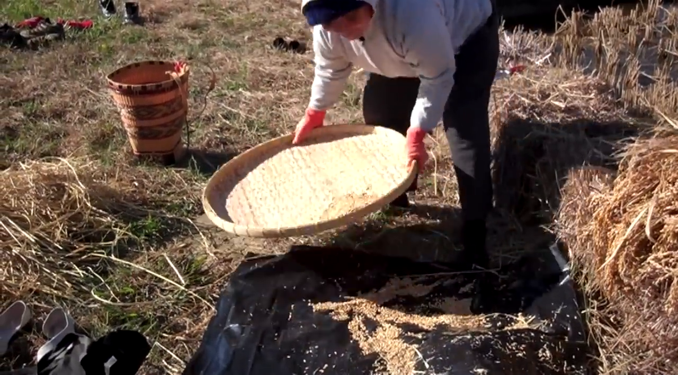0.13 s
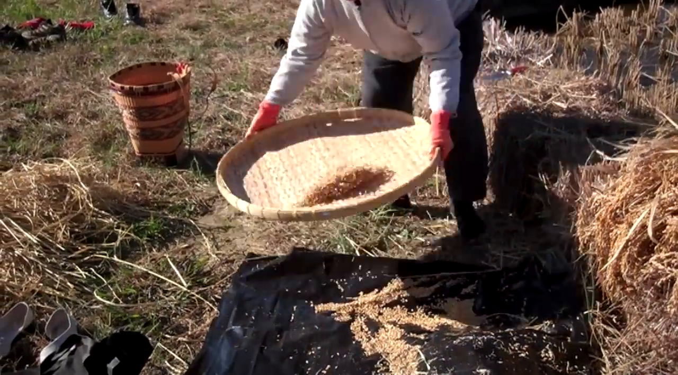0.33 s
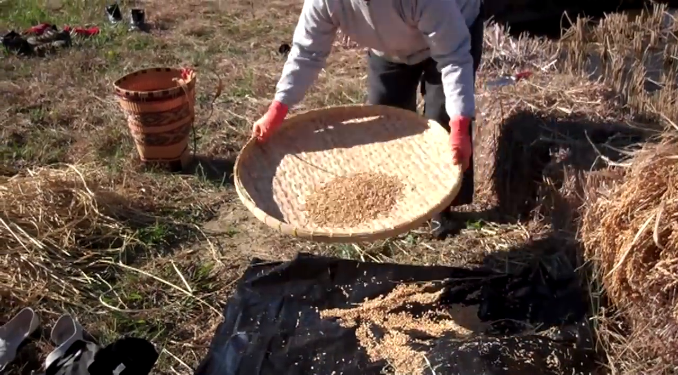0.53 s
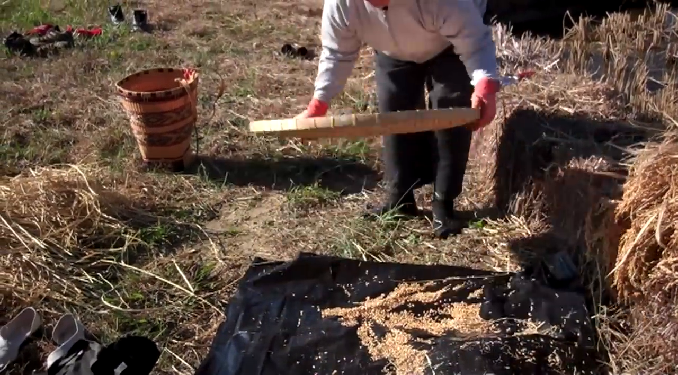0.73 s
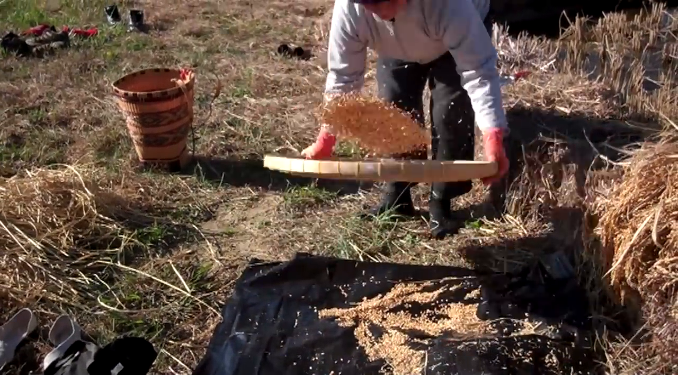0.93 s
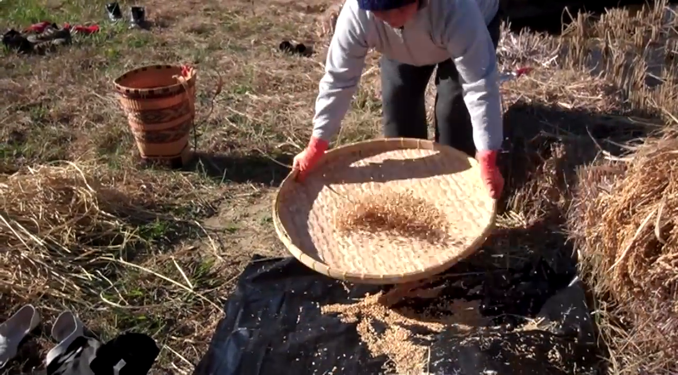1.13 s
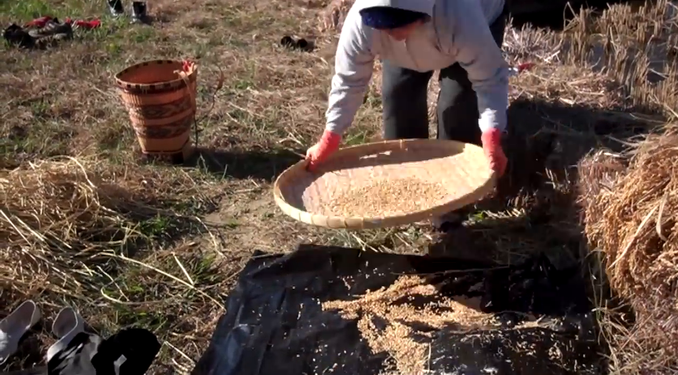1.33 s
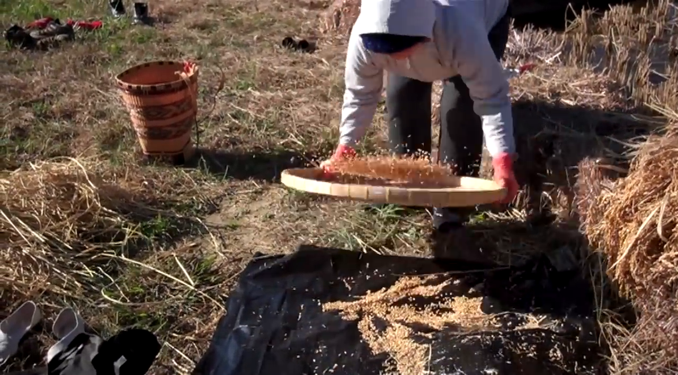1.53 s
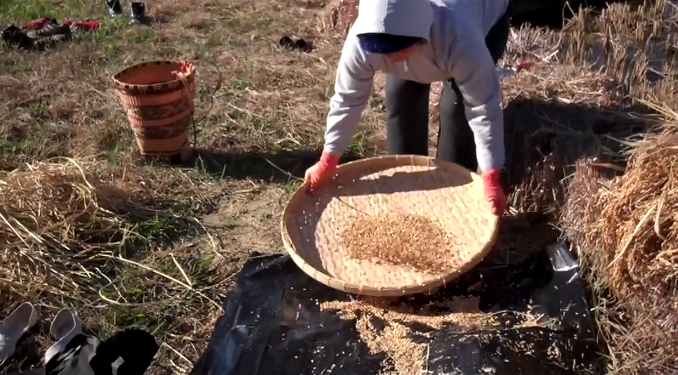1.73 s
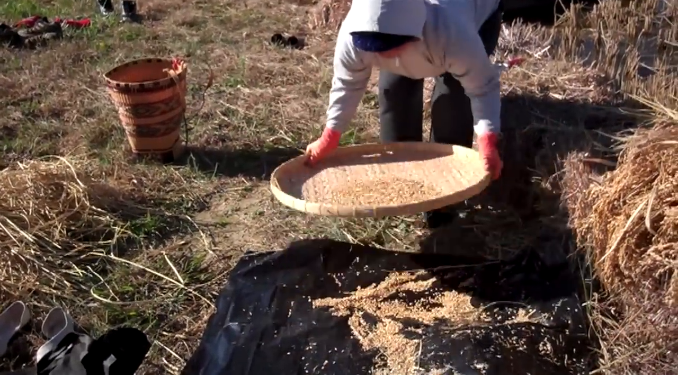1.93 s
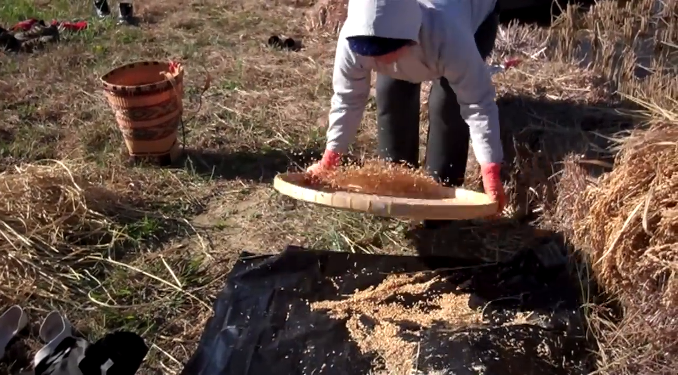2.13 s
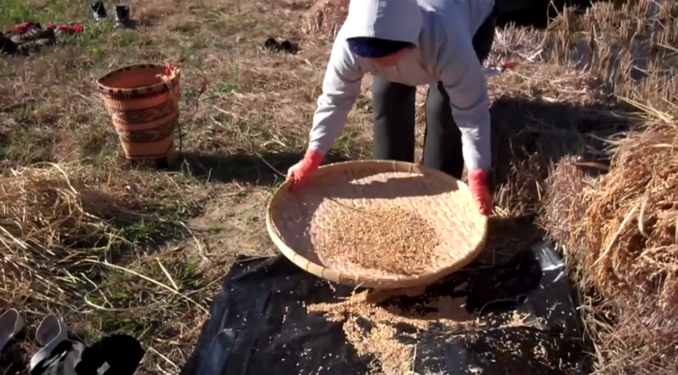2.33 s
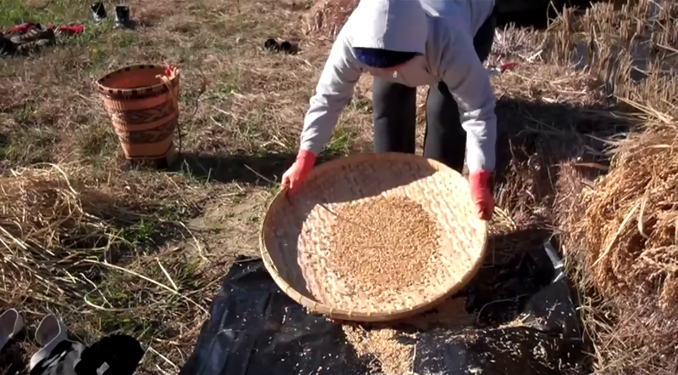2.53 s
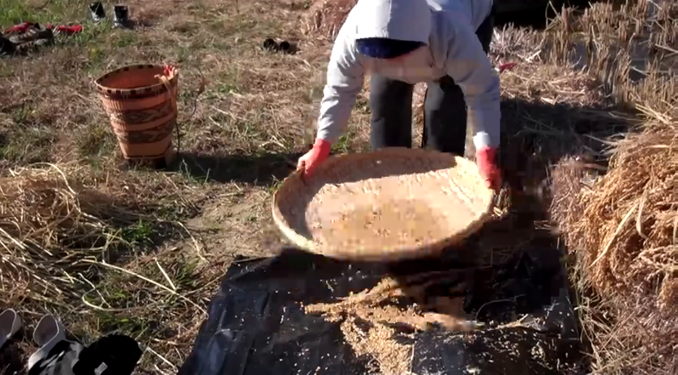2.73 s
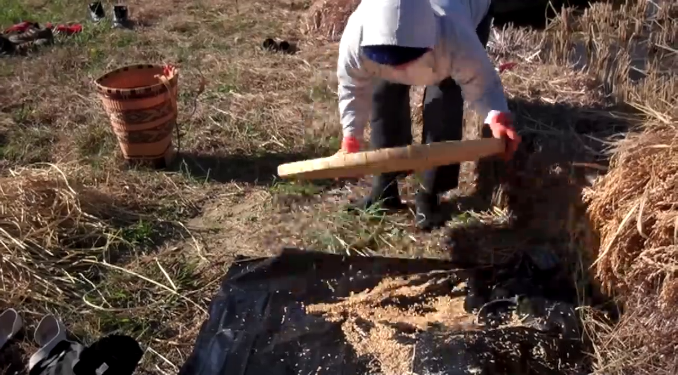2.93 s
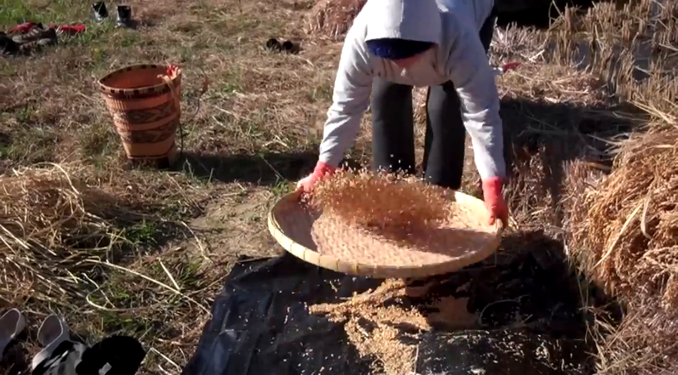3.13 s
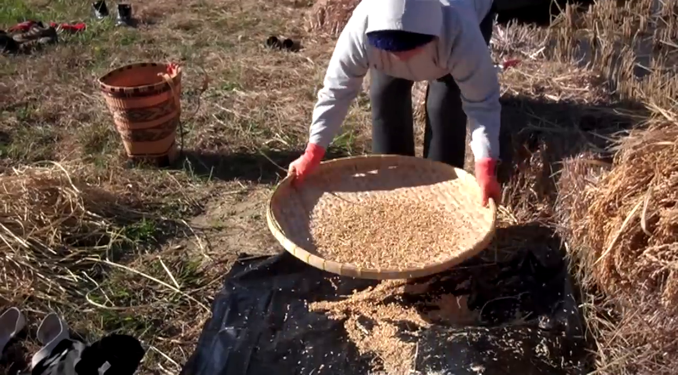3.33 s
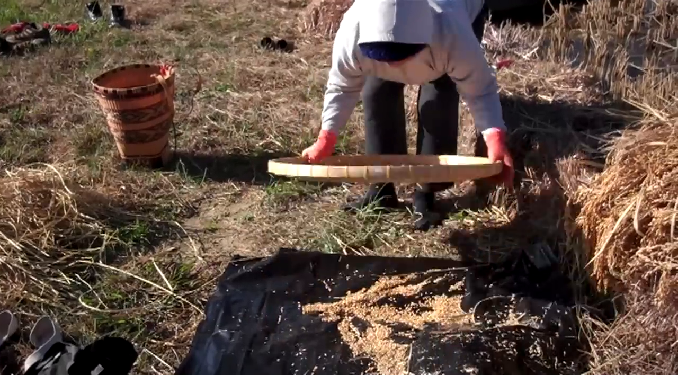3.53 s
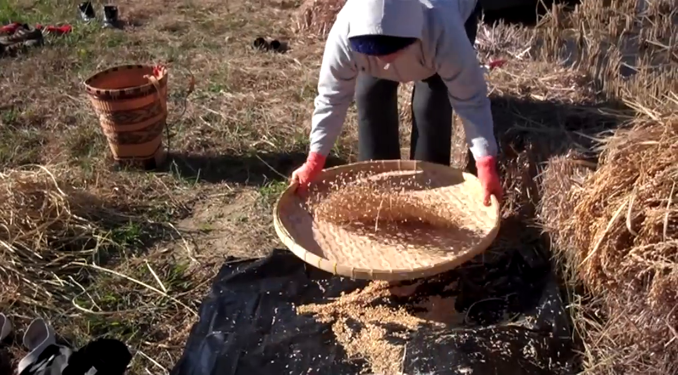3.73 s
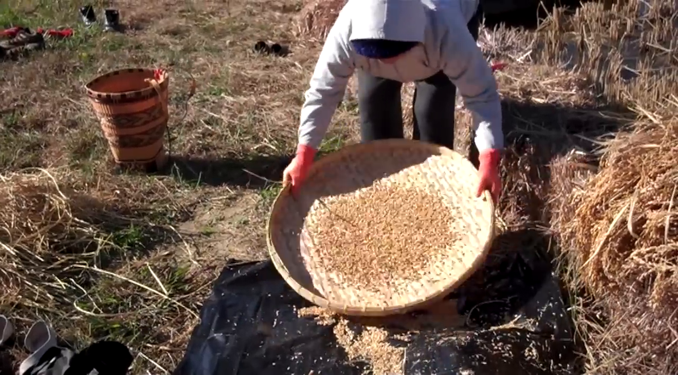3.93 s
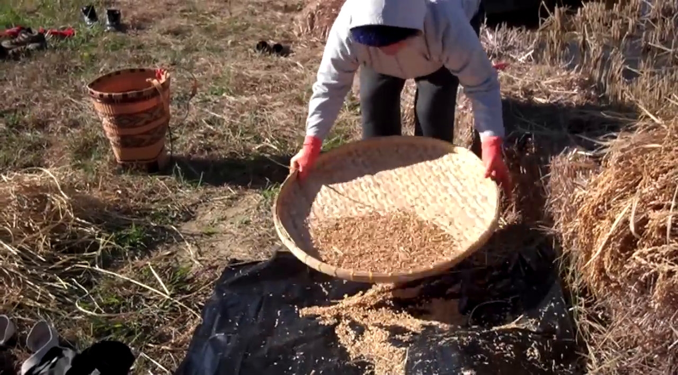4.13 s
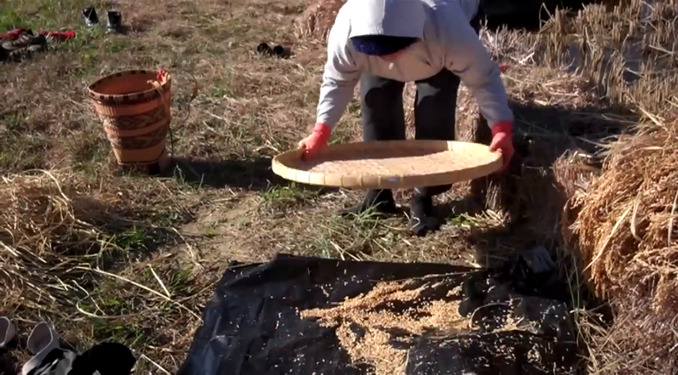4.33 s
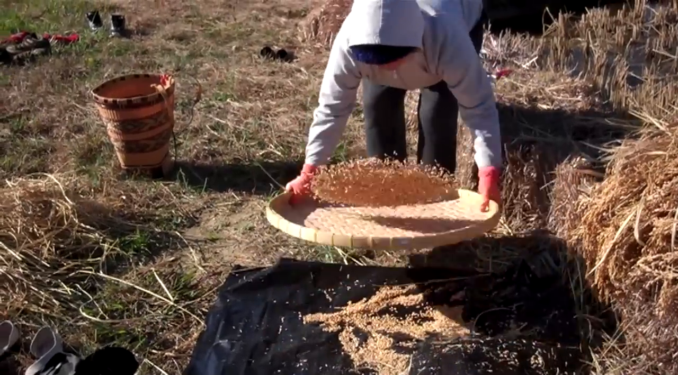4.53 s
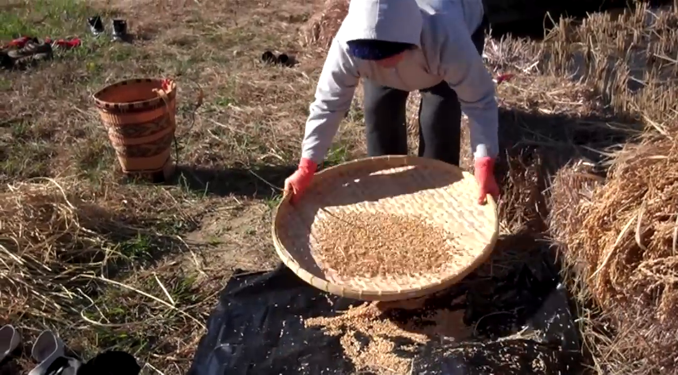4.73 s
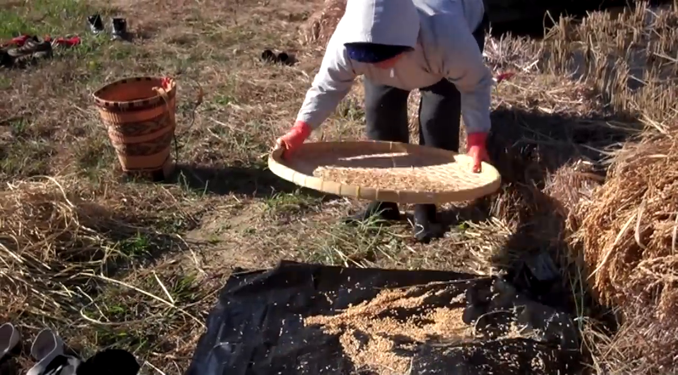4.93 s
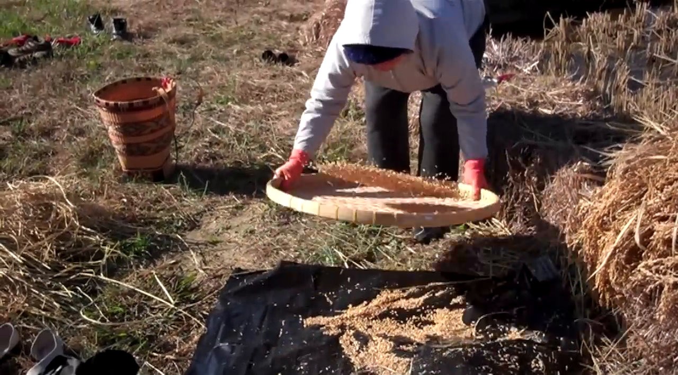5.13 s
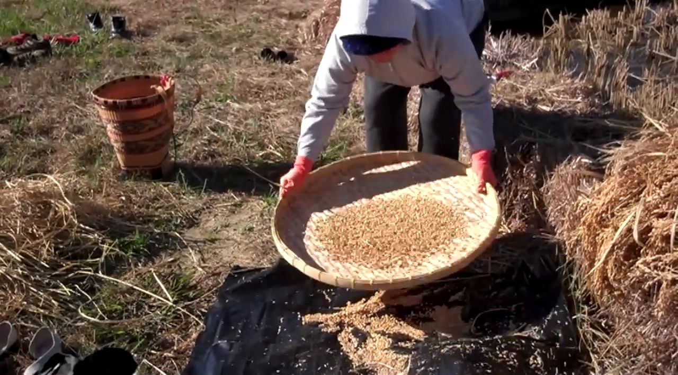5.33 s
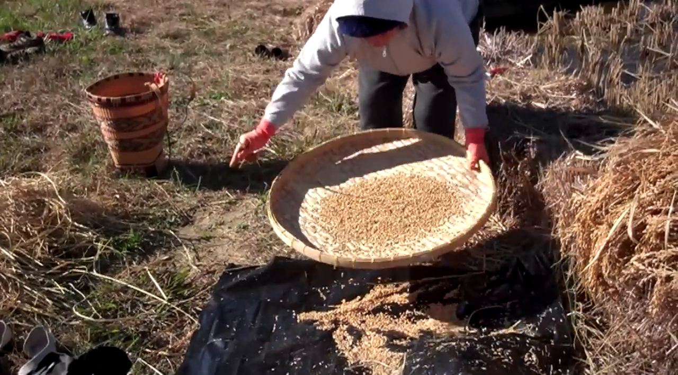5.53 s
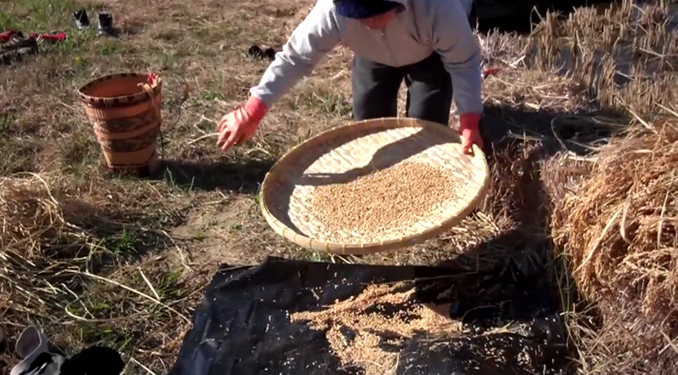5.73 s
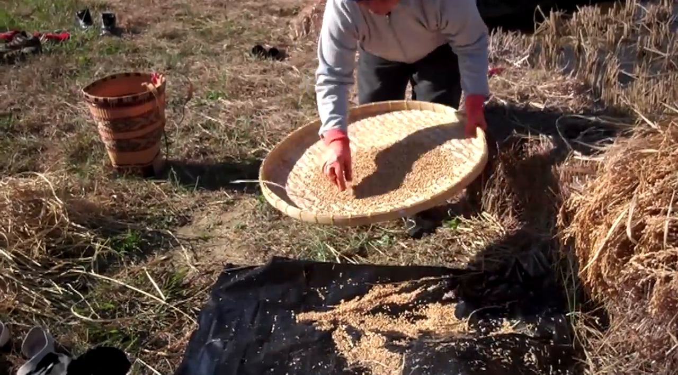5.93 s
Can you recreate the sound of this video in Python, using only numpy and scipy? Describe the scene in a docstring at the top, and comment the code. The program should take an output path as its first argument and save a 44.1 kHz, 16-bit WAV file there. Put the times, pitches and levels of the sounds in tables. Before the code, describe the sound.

Close stereo pickup of grain being winnowed by hand: sharp, sandy bursts arrive roughly every half second, with longer gaps where the heap merely slides across the weave. Each catch starts abruptly, swells for a fifth of a second and fades quickly. Ground reflection subtly colours the tray as it rises and sinks. Low open-field air, soft wind puffs and fine straw rustling lie beneath; the end settles into small bamboo ticks.

```python
"""Rice grain is tossed and shaken on a flat woven bamboo tray: dense random impacts, husk clicks over weave patter.
Each toss lands as a shower and runs off; the heap also slides, clumps stray, loose grains hop, the tray creaks.
The ground echoes the tray, with a delay that follows its height.
Dry straw crackles off to the right; filtered noise makes the breeze, mostly at the right microphone port,
and the low wash of the open harvested field."""
import sys
import numpy as np
from scipy import signal
from scipy.fft import rfft, irfft
from scipy.io import wavfile
from scipy.ndimage import map_coordinates

SR = 44100
rng = np.random.default_rng(int(sys.argv[2]) if len(sys.argv) > 2 else 0)


def waveform_to_disk(signal):
    """Save audio, clipped to [-1, 1], as 16-bit WAV at the path in sys.argv[1]."""
    frames = np.transpose(np.atleast_2d(signal))
    scaled = np.clip(frames, -1, 1) * 32767
    samples = np.round(scaled).astype(np.int16)
    wavfile.write(sys.argv[1], SR, samples)


N = 268701
TAPS = 2048  # samples per impact before trimming
T = np.arange(N) / SR
HZ = np.fft.rfftfreq(TAPS, 1 / SR)

# Husk click. Each row: frequency in Hz, relative density in dB per Hz.
HUSK_SPECTRUM = [(1200, -39.5), (2000, -18), (2750, -12.5), (3100, -9.5), (4200, -9), (5100, -7.5),
                 (6500, -2.5), (7050, -2), (7700, 2), (8300, -6), (9500, -9), (10900, -17), (14000, -17)]
# Weave patter. Each row: frequency in Hz, relative density in dB per Hz.
WEAVE_SPECTRUM = [(140, -70), (230, -25.5), (330, -16.5), (440, -23.5), (560, -11.5), (780, -3.5),
                  (1170, -1.5), (1430, -3.5), (1850, 1), (2600, -6), (3400, -13.5), (5700, -77)]
# Tray at the two ports. Each row: frequency in Hz, left over right in dB.
TRAY_BALANCE = [(500, 0), (2000, 0.4), (2700, -2.5), (4200, 0.8), (5200, -0.3), (6400, -1.9), (7100, 1.5),
                (7750, 10.1), (8400, 8.0), (9500, 12.6), (11000, 13.0), (13500, 25.0)]
# Likeness of the ports for the tray. Each row: frequency in Hz, likeness 0-1.
TRAY_LIKENESS = [(100, .9), (500, 1), (1200, .99), (2500, .76), (3800, .99), (4800, .74), (6800, .9),
                 (9000, .56), (12000, .3)]
# Catches. Each row: start in s, shower length in s, relative husk hiss in dB, weave weight in dB against the hiss,
# place of the peak 0-1, run-off in dB against the hiss, run-off fade in dB per s, run-off length in s.
LANDINGS = [(1.147, 0.2, -14.5, -12, 0.41, -8.5, 71, .25), (1.747, .18, -14.5, -13, 0.63, -9.5, 74, 0.18),
            (2.309, .178, -14.5, -12.5, 0.48, -6.5, 80, 0.062),
            (3.238, .18, -14, -12.5, 0.45, -14.5, 100, 0.18), (3.797, 0.17, -14, -12.5, 0.43, -7, 77, 0.12),
            (4.683, 0.18, -14.5, -12, 0.55, -13, 83, 0.15), (5.259, 0.18, -14.5, -13.5, 0.58, -15, 28, .18)]


def amp(db):
    """Decibels to gain."""
    return 10 ** (np.asarray(db) / 20)


def curve_at(points, hz):
    """Joins points by straight lines on a log-frequency axis."""
    f, value = np.transpose(points)
    return np.interp(np.log(hz + 1), np.log(f + 1), value)


def level_curve(points):
    """Joins (s, dB) points over the scene and returns gain."""
    return amp(np.interp(T, *np.transpose(points)))


def unit_rms(x):
    """Scales a stereo pair so that its centre has rms 1."""
    return x / np.sqrt(np.mean(x.mean(0) ** 2) + 1e-20)


def mix_in(mix, start_s, sound):
    """Adds a stereo sound at start_s, cut at the end of the mix."""
    part = mix[:, round(start_s * SR):][:, :sound.shape[1]]
    part += sound[:, :part.shape[1]]


def minimum_phase(db):
    """Response with this gain that rings only after the blow."""
    log_gain = np.log(amp(np.maximum(db, -100)))
    circle = np.concatenate([log_gain, log_gain[-2:0:-1]])
    return np.exp(np.conj(signal.hilbert(circle)))[:len(db)]


def impacts(spectrum, balance, likeness, ring_ms, lag_ms, count=48):
    """Stereo ticks, one per spot struck: decaying noise, each different, sharing one mean spectrum."""
    # Phase between ports. Each row: frequency in Hz, left lead in radians.
    port_phase = [(0, 0), (1500, 0), (2400, -.6), (3000, -.1), (4200, 0), (4800, -.7), (5900, -.7),
                  (7300, .25), (9000, -1), (14000, -2.8)]
    ms = 1000 * np.arange(TAPS) / SR
    a, b = rfft(rng.standard_normal((2, count, TAPS)) * np.exp(-ms / ring_ms))
    b = b - a * (b * a.conj()).mean(0) / (abs(a) ** 2).mean(0)  # the part the ports do not share
    left, own = (z / np.sqrt((abs(z) ** 2).mean(0)) for z in (a, b))
    same = np.clip(curve_at(likeness, HZ), 0, 1)
    left_lead = curve_at(port_phase, HZ) - 2 * np.pi * HZ * lag_ms / 1000
    right = same * left + np.sqrt(1 - same ** 2) * own
    right = right * np.exp(-1j * left_lead) / amp(curve_at(balance, HZ))
    ticks = irfft(np.array([left, right]) * minimum_phase(curve_at(spectrum, HZ)))
    return np.roll(ticks, 24, axis=-1)[..., :TAPS // 2]  # room ahead for phase lead


def tray_impacts(spectrum, ring_ms):
    """Ticks with the port differences of the tray."""
    return impacts(spectrum, TRAY_BALANCE, TRAY_LIKENESS, ring_ms, lag_ms=0)


def shower(ticks, per_s, spread_db):
    """Random impacts of uneven size on random spots, at steady power whatever their rate."""
    chance = np.clip(per_s / SR, 1e-4, 1)
    size = amp(spread_db * np.minimum(rng.exponential(1, N), 5)) * rng.choice([-1, 1], N)
    clicks = size * (rng.random(N) < chance) / np.sqrt(chance)
    spot = rng.integers(0, ticks.shape[1], N)
    out = np.zeros((2, N))
    for k in range(ticks.shape[1]):
        struck = clicks * (spot == k)
        out += signal.oaconvolve(struck[None], ticks[:, k], axes=1)[:, :N]
    return unit_rms(out)


def wobble(corner_hz):
    """Slow random wobble of rms 1: low-passed noise."""
    slow = irfft(rfft(rng.standard_normal(N)) / (1 + (np.fft.rfftfreq(N, 1 / SR) / corner_hz) ** 4), N)
    return slow / slow.std()


def step(s, width_s):
    """Goes smoothly from 0 to 1 around time s."""
    return .5 + .5 * np.tanh((T - s) / (2 * width_s))


def loose_grains(level_db=-64, per_s=60):
    """Single grains keep hopping on the weave: sparse random impacts throughout."""
    return amp(level_db) * shower(tray_impacts(WEAVE_SPECTRUM, ring_ms=3.0), per_s, spread_db=3.0)


def height_m():
    """Tray height over the ground: highest before each landing, lowest just after the catch."""
    high_m, low_m, high_before_s, low_after_s = .6, 0.2425, 0.265, 0.091
    turns = [(0, low_m)]
    for s, *_ in LANDINGS:
        turns += [(s - high_before_s, high_m), (s + low_after_s, low_m)]
    return np.interp(T, *np.transpose(turns))


def with_ground(x, echo_db=-11, dull_hz=5000):
    """The ground returns the tray's sound, duller; the delay sweeps as the tray rises and sinks."""
    delay_s = 2 * height_m() / 343
    late = np.array([map_coordinates(port, [np.arange(N) - delay_s * SR], order=3) for port in x])
    echo = signal.lfilter(*signal.butter(1, dull_hz, fs=SR), late)
    return amp(-0.36) * (x + amp(echo_db) * echo)


def straw():
    """Dry stalks crackle: a dense shower of short ticks that reaches the right port first."""
    # Rustle. Each row: time in s, level in dB.
    rustle = [(0, -32), (.08, -37.5), (.34, -37), (.75, -45), (1.1, -43), (1.7, -36.5), (2.12, -42),
              (3.05, -39), (3.7, -36.5), (4.45, -37), (4.58, -43), (5.05, -41), (5.6, -35.5), (5.87, -34),
              (6.05, -40)]
    # One crackle. Each row: frequency in Hz, relative density in dB per Hz.
    crackle = [(200, -33), (400, -22.5), (750, -15), (1250, -17.5), (2300, -10.5), (3500, -8), (4800, -4.5),
               (5700, -5.5), (6700, 0.2), (8200, 2), (10500, -8.5), (12300, -7.5), (14000, -11)]
    # Straw at the ports. Each row: frequency in Hz, left over right in dB.
    balance = [(1200, 1.7), (2100, -4.0), (3400, -1.3), (4700, -3.3), (5900, -9.0), (7200, 1.2),
               (8400, 8.2), (10500, 6.7), (13500, 17.4)]
    # Likeness of the ports for straw. Each row: frequency in Hz, likeness 0-1.
    likeness = [(500, 0.99), (2000, 0.46), (5000, 0.81), (7500, 1), (13000, 0.2)]
    ticks = impacts(crackle, balance, likeness, ring_ms=0.63, lag_ms=0.1)
    return level_curve(rustle) * shower(ticks, 13000, spread_db=2.0)


def eddies(hz, width_hz, size):
    """Swirling air, separate at each port: a noise band as a complex signal of rms 1."""
    r = np.exp(-np.pi * width_hz / SR)
    a, b = rng.standard_normal((2, 2, size + TAPS))
    swirl = signal.lfilter([1], np.poly([r, r]), a + 1j * b)[:, TAPS:]
    swirl = swirl / np.sqrt((abs(swirl) ** 2).mean(1, keepdims=True))
    return swirl * np.exp(2j * np.pi * hz * np.arange(size) / SR)


def breeze(left_db=-13, right_db=-1, gust_db=4):
    """Eddies bump the right port in puffs over an uneven flutter; the left port is sheltered."""
    # Flutter, dying away near the end. Each row: time in s, level in dB before port gain.
    wind = [(0, -48.5), (2.0, -47.5), (2.55, -51), (2.9, -42.5), (3.5, -65), (3.9, -52.5), (4.4, -48),
            (4.7, -69.5), (6.1, -69)]
    # Puffs. Each row: middle in s, peak in dB before port gain, centre in Hz, nominal length in s.
    puffs = [(0.248, -29, 196, 0.049), (.324, -35, 196, .02), (.418, -33, 150, .035),
             (0.672, -33, 164, 0.045), (0.885, -28.5, 196, 0.07), (1.656, -32, 157, 0.055),
             (2.035, -33.5, 166, 0.11), (2.14, -35.5, 225, .06), (2.21, -28.5, 198, 0.08),
             (2.286, -29.5, 160, 0.09), (2.83, -28.5, 123.3, 0.12), (2.947, -28, 152, 0.07),
             (3.074, -34, 143, 0.034), (3.28, -37, 155, 0.2), (3.952, -32, 110, .055),
             (4.449, -34, 102, 0.065)]
    out = level_curve(wind) * amp(gust_db * wobble(17)) * eddies(105, 140, size=N).real
    for s, db, hz, length_s in puffs:
        size = round(1.1 * length_s * SR)
        puff = eddies(hz, 4.6 / length_s, size).real * np.hanning(size)  # the shorter, the broader
        mix_in(out, s - size / SR / 2, amp(db) * puff / abs(puff).max(1, keepdims=True))
    return amp([[left_db], [right_db]]) * out


def air(level_db=-56.5, apart=0.26):
    """Low steady wash of the open field: shaped noise, partly opposed between the ports."""
    # Field. Each row: frequency in Hz, relative density in dB per Hz.
    field = [(15, -36), (25, -11), (70, 4.5), (156, -0.5), (461, -7.5), (575, -4), (678, -2), (1410, -12.5),
             (2000, -14), (2600, -10), (4400, -120)]
    gain = amp(curve_at(field, np.fft.rfftfreq(N, 1 / SR)))
    shared, side = rfft(rng.standard_normal((2, N))) * gain
    return amp(level_db) * unit_rms(irfft(np.array([shared + apart * side, shared - apart * side]), N))


def creaks(level_db=5.0, ring_s=0.006, width_hz=700):
    """Bamboo strips slip against each other: a brief noise snap rings the tray."""
    # Creaks and ticks. Each row: start in s, peak in dB before level_db, resonance in Hz.
    snaps = [(0.089, -42, 1880), (0.147, -42, 902), (0.699, -33.5, 1390), (0.811, -43, 668),
             (1.02, -43, 1700), (1.579, -40, 993), (4.421, -36, 1730), (4.625, -39, 1050),
             (5.644, -38, 1070), (5.717, -34.5, 1330), (5.798, -35, 1213), (5.846, -31, 1950),
             (5.86, -28.5, 1790)]
    out, t = np.zeros((2, N)), np.arange(TAPS) / SR
    for s, db, hz in snaps:
        slip = rng.standard_normal(TAPS) * np.exp(-t / ring_s)
        resonance = 1 + ((HZ - hz) / width_hz) ** 2
        bass_loss = 1 + (550 / (HZ + 1)) ** 4  # the open weave radiates little bass
        tick = irfft(rfft(slip) * minimum_phase(-10 * np.log10(resonance * bass_loss)))
        mix_in(out, s, amp(db) * np.array([tick, tick]) / abs(tick).max())
    return amp(level_db) * out


def grain(clump_db=0.72, thin_db=1.0):
    """More flow, thicker impacts: husks click, the weave patters under the weight, more so for thin grain."""
    # Slides on the tilted tray. Each row: time of full speed in s, relative husk hiss in dB,
    # weave weight in dB against the hiss, swell in dB per s, fade in dB per s.
    slides = [(0.465, -21.5, -17, 277, 163), (0.589, -25.5, -13, 274, 245), (2.58, -23, -11.5, 400, 222),
              (2.745, -16, -12.5, 257, 154), (4.188, -15, -12, 241, 161)]
    moves = [(db, weight_db, landing(s, length_s, *tail)) for s, length_s, db, weight_db, *tail in LANDINGS]
    moves += [(db, weight_db, slide(s, *slopes)) for s, db, weight_db, *slopes in slides]
    hiss = np.sqrt(sum(amp(db) ** 2 * power for db, _, power in moves))
    patter = np.sqrt(sum(amp(db + weight_db) ** 2 * power for db, weight_db, power in moves))
    flow = hiss / hiss.max()
    patter = patter * amp(thin_db * (1 - flow))
    per_s = 11000 + 12000 * flow
    husks = shower(tray_impacts(HUSK_SPECTRUM, ring_ms=0.52), per_s, spread_db=2.0)
    weave = shower(tray_impacts(WEAVE_SPECTRUM, ring_ms=3.0), .3 * per_s, spread_db=2.0)
    return (amp(0.2) * hiss * husks + amp(-1.36) * patter * weave) * amp(clump_db * wobble(36))


def slide(s, swell_db_per_s, fade_db_per_s, turn_s=0.063):
    """Power of one slide: the heap gathers speed, turns smoothly and slows."""
    away_s = np.hypot(T - s, turn_s) - turn_s
    return amp(-away_s * np.where(T < s, swell_db_per_s, fade_db_per_s)) ** 2


def strays(level_db=-5, ring_ms=4.3):
    """Small clumps hit the tray on their own, most just ahead of a shower: one husk tick each."""
    # Clumps. Each row: start in s, peak in dB before level_db.
    clumps = [(1.13, -16), (1.144, -8), (2.3034, -5), (2.3912, 3), (3.2086, -14.5), (3.2226, -23),
              (3.7724, -11), (3.7788, -7), (3.798, 1), (4.6397, -10), (5.2245, -12.5), (5.2607, -8),
              (5.5605, -10)]
    out, ticks = np.zeros((2, N)), tray_impacts(HUSK_SPECTRUM, ring_ms)
    for k, (s, db) in enumerate(clumps):
        mix_in(out, s, amp(db) * ticks[:, k] / abs(ticks[:, k]).max())
    return amp(level_db) * out


def landing(s, length_s, peak_at, run_off_db, fade_db_per_s, run_off_s):
    """Power of one catch: a few early grains, the arch of the shower, then grain rolling to rest."""
    attack_s, stop_s = 0.004, 0.013  # arrives at once, thins out more slowly
    early_db, early_s, arch_db = -11.5, 0.012, 2.5
    end_s = s + length_s
    arrived, over, at_rest = step(s, attack_s), step(end_s, stop_s), step(end_s + run_off_s, stop_s)
    early = amp(early_db) * np.exp(-abs(T - s) / early_s)
    arch = amp(-arch_db * (2 * ((T - s) / length_s - peak_at)) ** 2)
    cloud = arrived * (1 - over) * arch
    rolling = over * (1 - at_rest) * amp(run_off_db - fade_db_per_s * np.maximum(T - end_s, 0))
    return early ** 2 + cloud ** 2 + rolling ** 2


def scene():
    """The tray over the ground, with straw, breeze and field around it."""
    tray = grain() + strays() + loose_grains() + creaks()
    return with_ground(tray) + straw() + breeze() + air()


def record(dry, edge_hz=14280):
    """Full-scale limit, then a low-pass band limit."""
    edge = signal.firwin(511, edge_hz, window=("kaiser", 9), fs=SR)
    return signal.oaconvolve(np.clip(dry, -1, 1), edge[None], "same")


dry = scene()
out = record(dry)
waveform_to_disk(out)
```